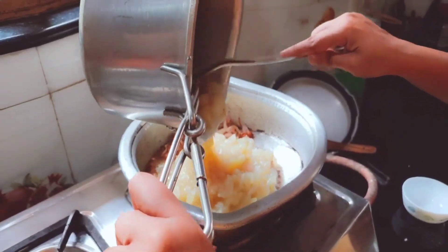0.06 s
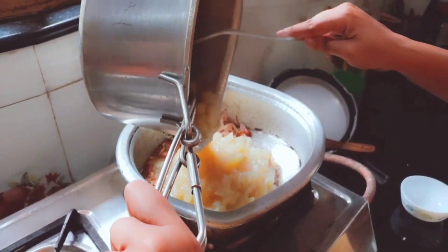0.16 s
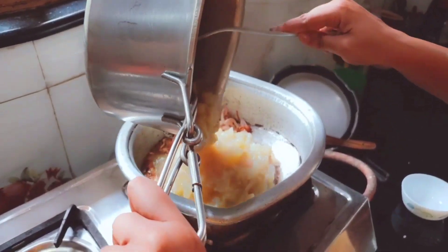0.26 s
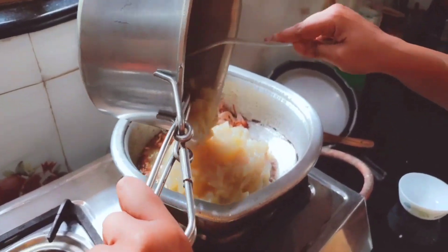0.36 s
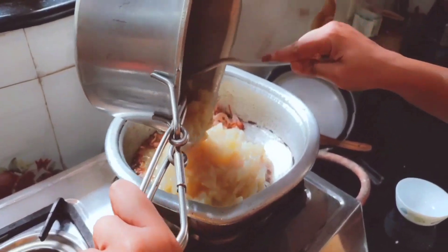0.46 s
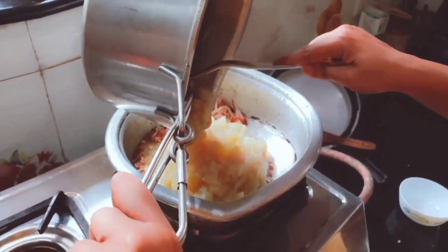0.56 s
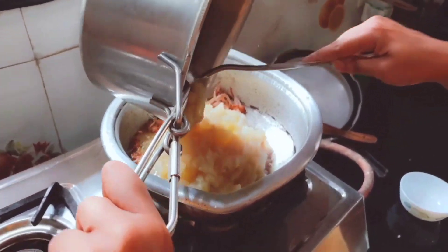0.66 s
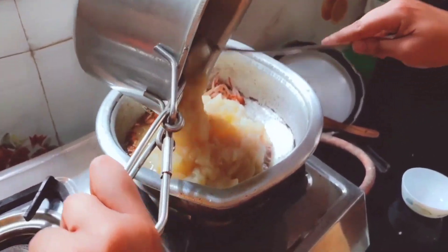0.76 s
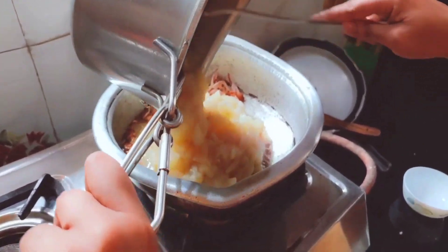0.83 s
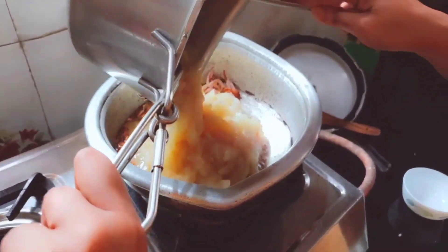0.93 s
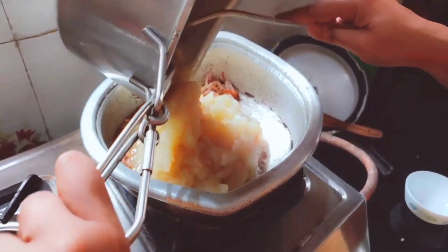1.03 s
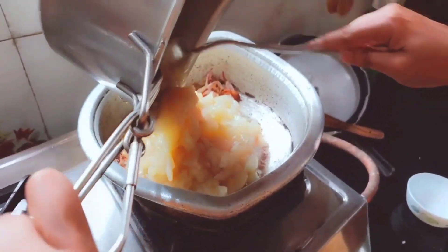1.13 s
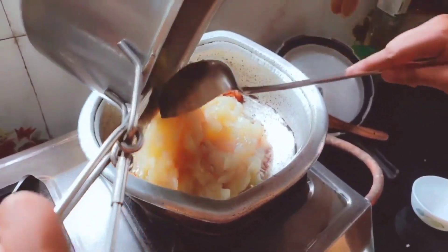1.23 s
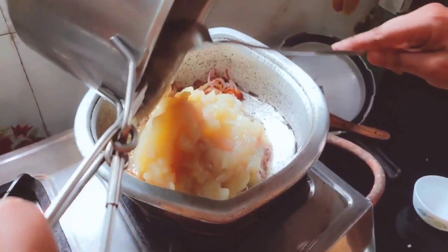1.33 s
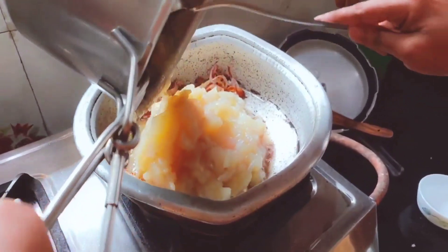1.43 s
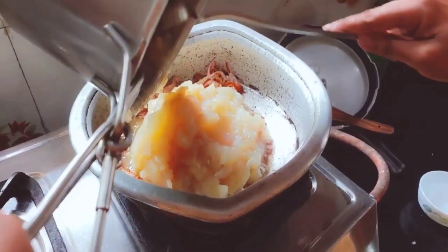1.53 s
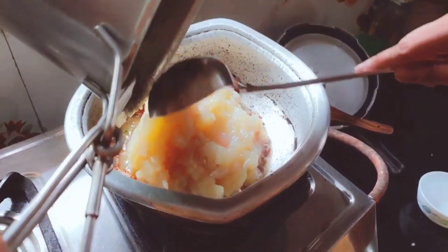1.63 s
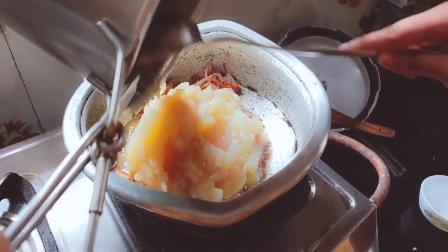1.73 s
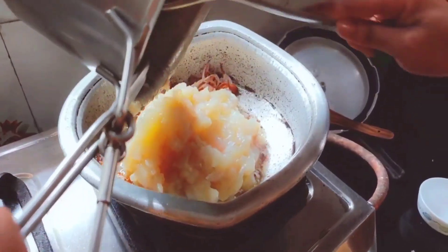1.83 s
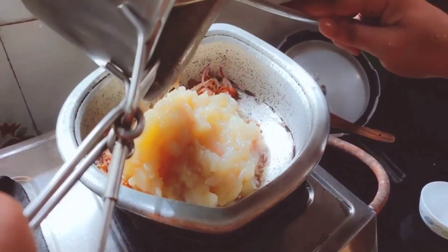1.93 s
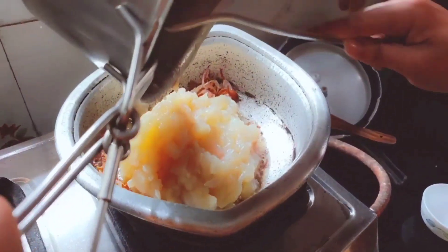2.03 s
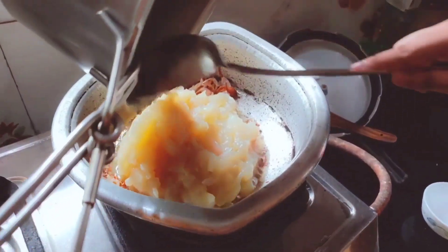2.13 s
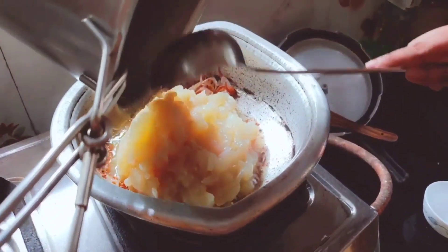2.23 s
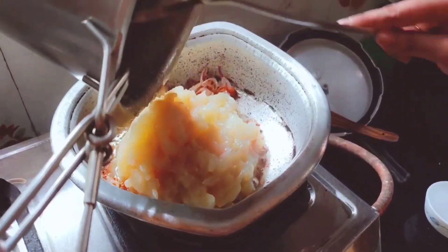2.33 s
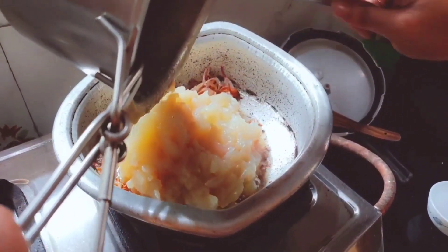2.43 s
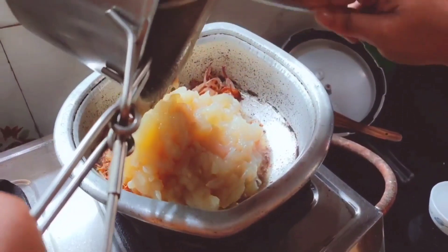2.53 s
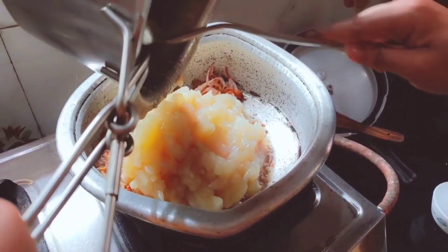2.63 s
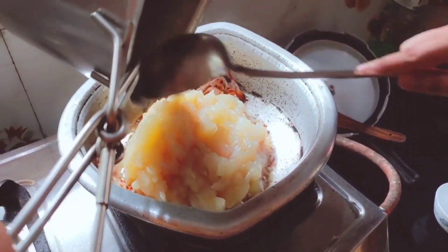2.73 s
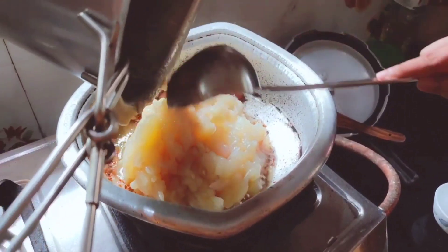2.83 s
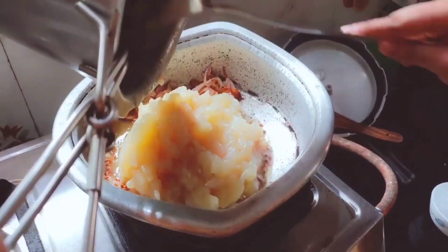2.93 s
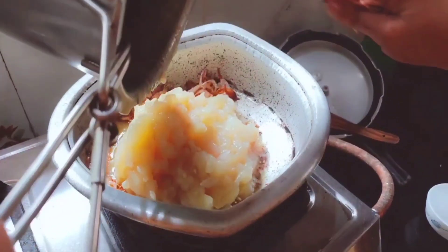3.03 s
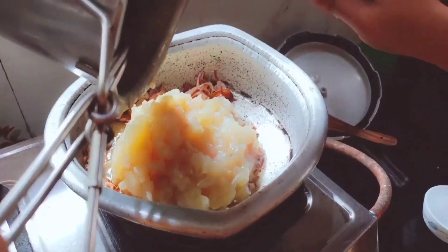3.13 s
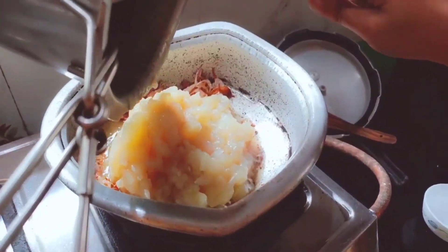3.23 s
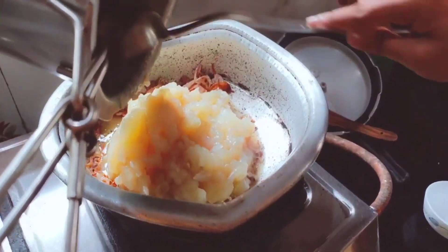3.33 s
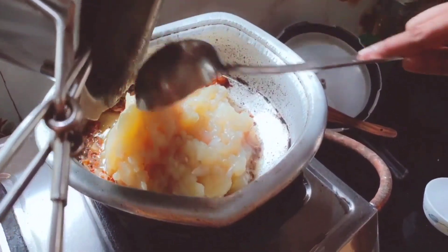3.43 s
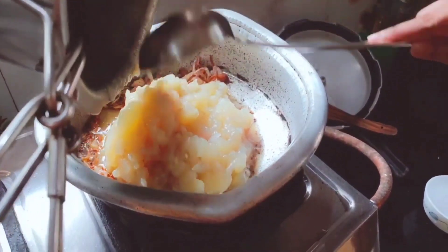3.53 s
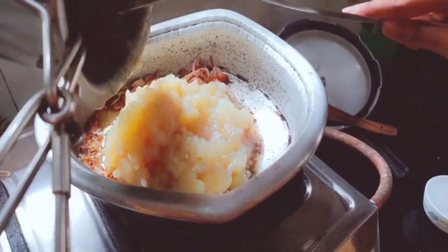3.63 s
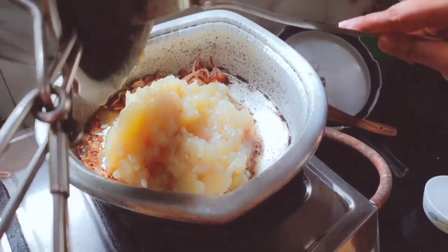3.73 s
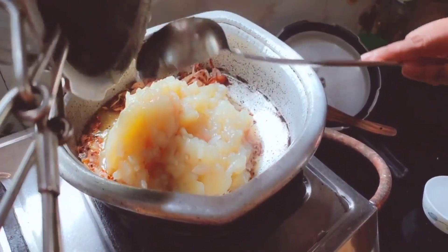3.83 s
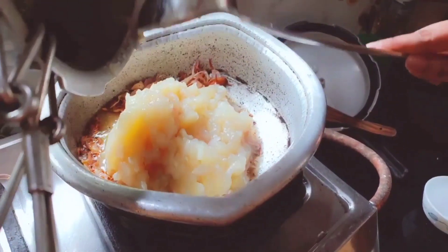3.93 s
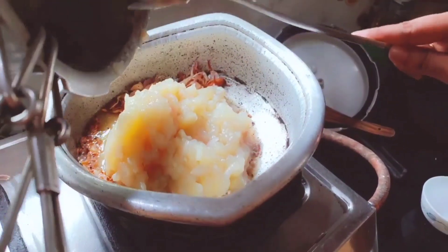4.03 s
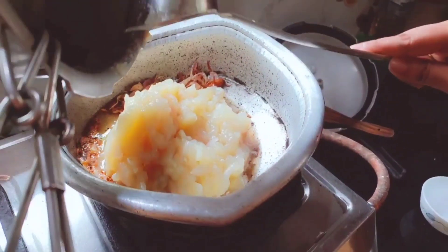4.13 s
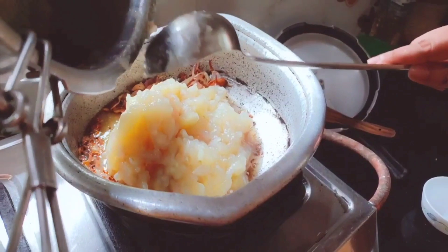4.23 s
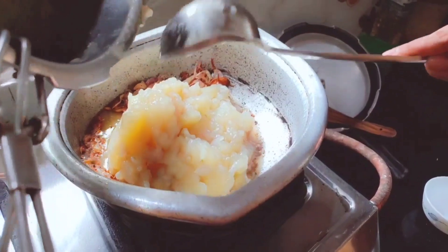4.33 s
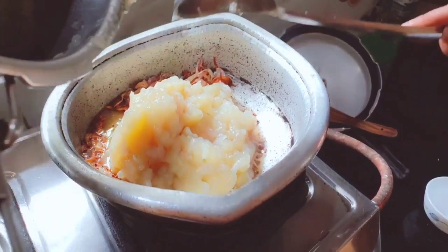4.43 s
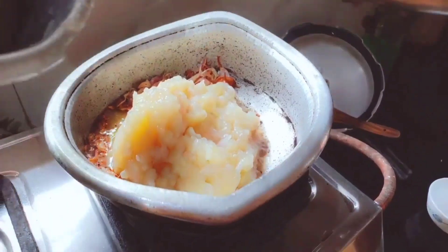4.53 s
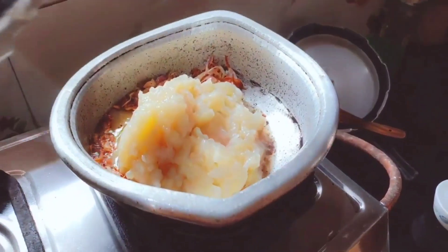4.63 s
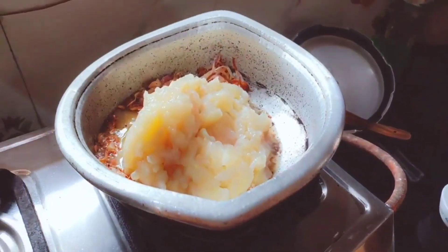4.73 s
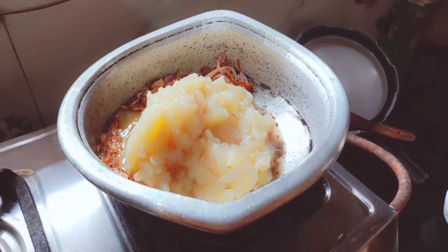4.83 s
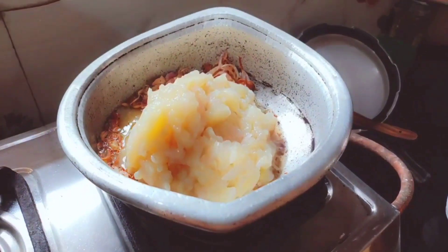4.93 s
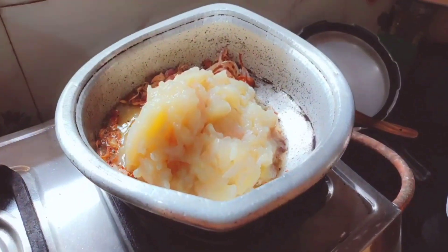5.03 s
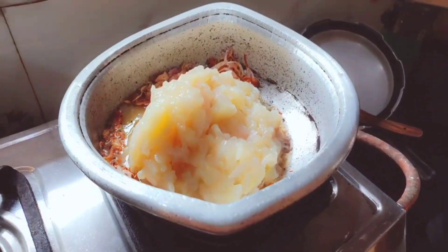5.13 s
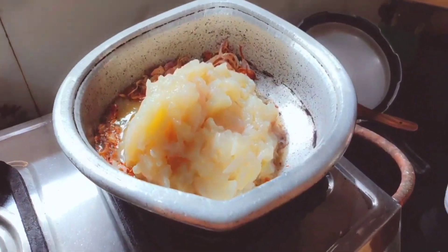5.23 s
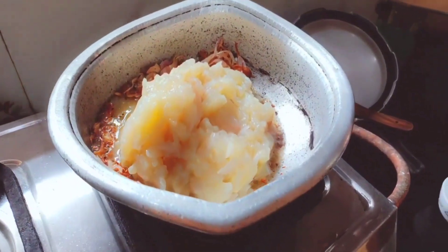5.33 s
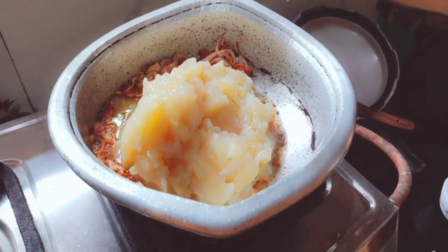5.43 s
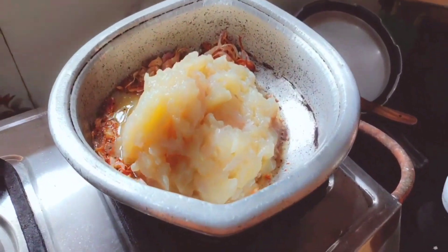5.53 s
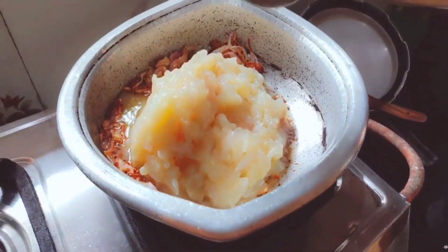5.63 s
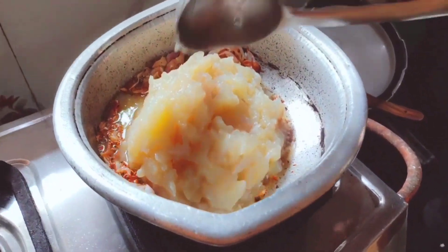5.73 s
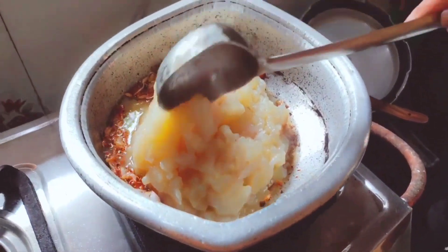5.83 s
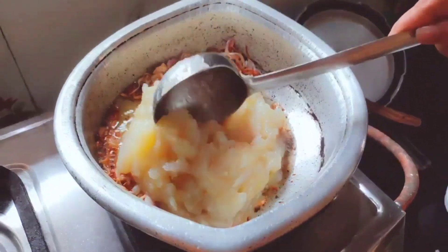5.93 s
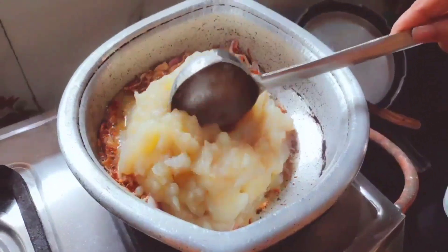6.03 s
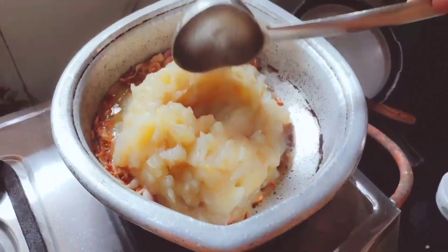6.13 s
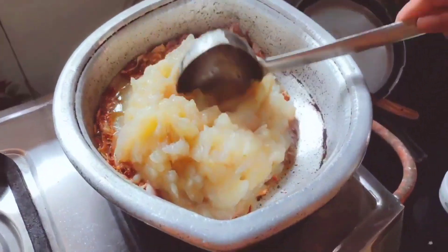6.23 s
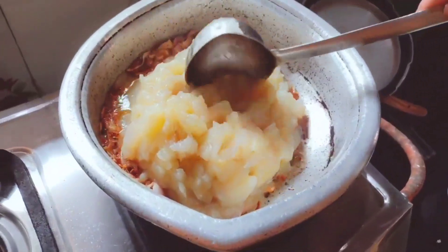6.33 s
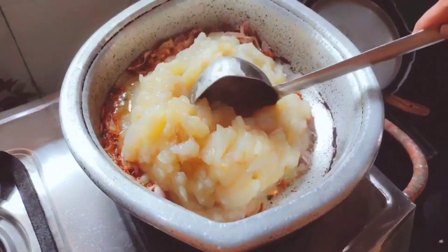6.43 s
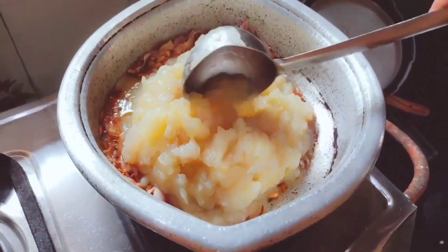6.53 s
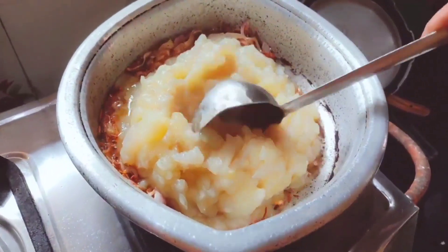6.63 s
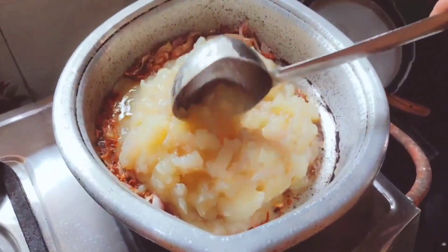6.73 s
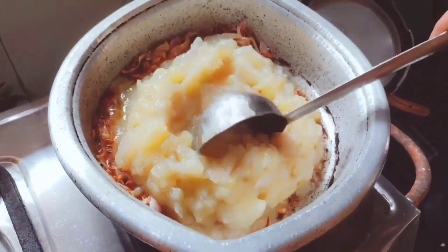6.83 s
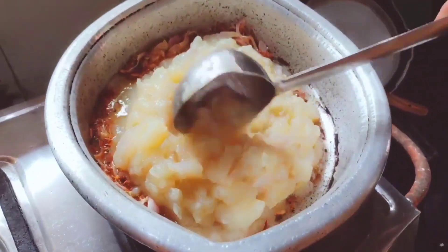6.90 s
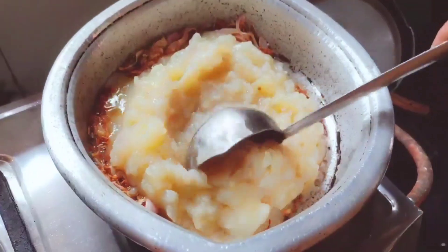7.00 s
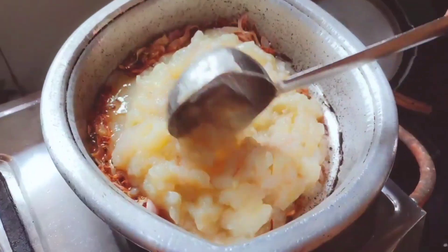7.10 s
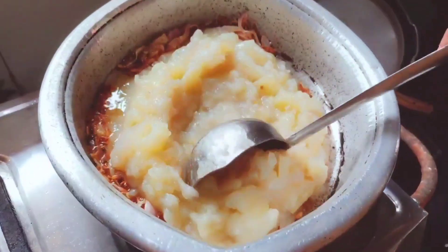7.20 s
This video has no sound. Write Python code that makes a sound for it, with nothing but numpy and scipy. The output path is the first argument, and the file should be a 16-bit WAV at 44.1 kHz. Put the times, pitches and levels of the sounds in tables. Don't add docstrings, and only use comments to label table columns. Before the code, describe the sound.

Sharp metallic clanks and short gritty scrapes of a ladle emptying a metal pot, a quiet gap, then duller, squelchy scrapes in a pan.

```python
import sys
import numpy as np
from scipy import signal
from scipy.fft import irfft
from scipy.io import wavfile
from scipy.ndimage import uniform_filter1d

SR = 44100
rng = np.random.default_rng(int(sys.argv[2]) if len(sys.argv) > 2 else 0)


def voltage_ratio(level):
    return 10 ** (np.asarray(level, float) / 20)


def bounce(signal):
    frames = np.transpose(np.atleast_2d(signal))
    limited = np.clip(frames, -1, 1)
    pcm = np.round(limited * 32767).astype(np.int16)
    wavfile.write(sys.argv[1], SR, pcm)


N = 320166
TIME = np.arange(N) / SR

# t/s, level/dB
HUM_LEVEL = [
    (0.0, -42),
    (.33, -48),
    (1.0, -48.5),
    (1.38, -44),
    (1.9, -39),
    (2.4, -47.5),
    (4.4, -46.5),
    (5.4, -48),
    (7.26, -55),
]
# f/Hz, density/dB per Hz
HUM_SPECTRUM = [(140, -24.5), (215, -16), (300, -41.5), (365, 2.5), (450, -16.5), (700, -11), (1200, -7.5),
                (2000, -6.5), (3000, -13), (4600, -12.5), (5700, -19.5), (6700, -31), (8200, -29.5),
                (9800, -34)]
# f/Hz, width/Hz, level over the hum/dB
AIR_DRONES = [(215, 20, -11), (366, 18, -30)]
# t/s, level/dB
HAND_BUMPS = [(0.0, -51), (.27, -63), (.55, -52), (.93, -62), (1.18, -60), (1.64, -49), (2.08, -53),
              (3.86, -54), (4.08, -49), (4.18, -46), (4.77, -67), (5.07, -44), (5.27, -51), (5.57, -59),
              (5.66, -49), (5.74, -49), (6.39, -49), (6.7, -49.5), (6.9, -61), (7.22, -55)]

# t/s, level/dB, f/Hz, length/s, width as share of f
SLURPS = [(2.43, -38, 1800, 0.054, 0.15), (4.661, -37, 1330, 0.028, 0.16), (4.778, -30, 940, 0.0068, 0.66),
          (6.27, -27, 3740, 0.0095, 0.049), (6.295, -13, 2228, 0.029, 0.015),
          (6.639, -12, 1590, 0.012, 0.17), (6.682, -10.5, 1510, 0.015, 0.42),
          (6.848, -29, 2560, 0.035, 0.11), (6.876, -26.5, 1050, 0.038, 0.13),
          (6.92, -20, 1610, 0.019, 0.13), (7.164, -23.5, 731, 0.021, 0.015),
          (7.246, -9.5, 1650, 0.018, 0.084)]
# t/s, level/dB, f/Hz, length/s, width as share of f
THUMPS = [(0.5, -23, 337, 0.017, 1), (3.71, -27.5, 363, 0.019, 0.23), (4.081, -21, 364, 0.023, 0.55),
          (4.783, -37, 366, 0.017, 0.39), (4.964, -33, 366, 0.012, 0.077), (5.056, -31, 412, 0.019, 0.2),
          (5.074, -44, 370, 0.0058, 0.069), (5.24, -38.5, 214, 0.032, 0.062),
          (5.335, -36.5, 215, 0.011, 0.033), (6.315, -20, 204, 0.034, 0.1),
          (6.65, -22.5, 458, 0.015, 0.066), (6.694, -11, 426, 0.0056, 0.21),
          (6.718, -12.5, 410, 0.0068, 0.27), (7.17, -28.5, 390, 0.022, 0.22)]
# t/s, level/dB, f/Hz, length/s, width as share of f
CLINKS = [
    (1.945, -8.5, 3260, 0.025, 0.0072),
    (6.267, -31.5, 6360, 0.015, 0.047),
    (6.268, -34.5, 4870, 0.011, 0.22),
    (7.01, -47.5, 5330, 0.017, 0.18),
    (7.138, -30.5, 3270, 0.048, 0.012),
]

# t/s, length/s, belly level/dB, wall minus belly/dB, ladle minus belly/dB
PAN_PUSHES = [(5.566, 0.073, -10, 0, -10), (5.63, 0.12, -15.5, -3, -12), (5.72, 0.048, -8.5, -3, -11.5),
              (5.903, 0.051, -13, 0.5, -7), (5.935, 0.046, -17, -3, -8), (5.97, 0.057, -23.5, 0, -9.5),
              (6.03, 0.041, -26.5, 3.5, -4), (6.075, 0.011, -25.5, -2, -1.5), (6.14, 0.019, -41.5, 0.5, -8),
              (6.302, 0.09, -12, -3, -8), (6.38, 0.081, -18.5, -5, -21.5), (6.635, 0.019, -28, 2, -41),
              (6.678, 0.046, -22.5, 6.5, -8.5)]
# t/s, length/s, belly level/dB, wall minus belly/dB, ladle minus belly/dB
PAN_SPREADS = [
    (6.875, .03, -45, 0, -17),
    (6.92, 0.032, -28.5, 5, -17),
    (7.145, 0.034, -35, -5, -8),
    (7.24, 0.029, -25.5, 5, -10),
]
# t/s, length/s, wall level/dB, belly minus wall/dB, ladle minus wall/dB
POT_DRAGS = [(0.005, 0.002, -14, -4, -16.5), (.032, 0.024, -16, -12.5, -27), (.616, 0.081, -18.5, -13, -12),
             (.676, 0.027, -15.5, -4.5, -4), (.75, 0.0029, -16.5, -2, -1.5),
             (1.055, 0.064, -22.5, -10.5, 0), (1.15, 0.06, -20.5, 1.5, -9), (1.555, 0.017, -25, -1, -18),
             (1.585, 0.035, -17, -9.5, -7), (2.05, 0.067, -20.5, 0, -1.5),
             (2.122, 0.011, -19.5, -11.5, 9.5), (2.162, 0.015, -19.5, 3.5, 6), (2.2, 0.1, -42, -10, 3.5),
             (2.63, 0.092, -28.5, -3.5, -4), (2.705, 0.0061, -19, -20, -1.5), (2.761, 0.0045, -15, -2, 5.5),
             (3.232, 0.02, -18.5, -25, 1), (3.312, 0.1, -16.5, -4.5, -12.5), (3.35, 0.08, -16, -16, -3.5),
             (3.775, 0.04, -27.5, -3.5, -4.5), (3.82, 0.016, -23, -10.5, -15), (4.125, 0.078, -27.5, 0, 0),
             (4.195, 0.007, -20.5, -24, -10)]
# attack/dB per s, swell while held/dB per s, release/dB per s
PUSH_SLOPES = [(2500, -6, 470), (2500, -34, 490), (2500, -41, 490)]
SPREAD_SLOPES = [(500, 0.0037, 270), (500, 0, 830), (490, 0, 87)]
DRAG_SLOPES = [(600, 26, 490), (600, 84, 610), (604, 13, 363)]
RATTLE_SLOPES = [(1500, -150, 240), (1500, -200, 170), (1500, -100, 190)]

# f/Hz, width/Hz, level/dB
PAN_PEAKS = [(641, 31, 0), (840, 60, -1), (1110, 170, 0), (1860, 80, -7), (2340, 110, -11), (2660, 80, -13),
             (2940, 25, -11), (3070, 35, -11), (3260, 33, -9), (3380, 15, -13), (3560, 78, -15),
             (4410, 90, -20), (5360, 36, -26), (5630, 39, -29), (6090, 42, -30), (6270, 28, -29),
             (6690, 58, -35), (6920, 58, -35)]
POT_PEAKS = [(673, 42, -10), (1010, 85, -11), (1230, 54, -10), (1850, 41, 0), (2360, 180, -5),
             (2770, 37, -10), (3260, 39, -10), (3530, 42, -10), (3700, 28, -12), (4110, 64, -12),
             (4410, 43, -18), (4790, 45, -17), (5710, 130, -24), (6390, 150, -29), (6690, 30, -27),
             (7140, 33, -31), (7490, 28, -29), (7780, 26, -32), (7950, 53, -29)]
# f/Hz, density/dB per Hz
PAN_RASP = [(100, -23), (200, -10), (290, 0), (400, 7.5), (900, 13), (1700, -21), (3000, -30),
            (4500, -21.5), (5200, -35), (7000, -45.5), (9200, -48), (10200, -61)]
POT_RASP = [(100, -22), (300, -11), (600, 5.5), (1200, 0.5), (2300, 7.5), (3600, -14), (4800, -17),
            (5400, -14.5), (7000, -23), (9200, -29.5), (10200, -31)]
STROKE_EDGES = (60, 1500, 2900, 12000)

# t/s, wall level/dB, then belly, ladle bowl and ladle edge minus wall/dB
RIM_KNOCKS = [
    (0.26, -13.5, -13, -8, -16.5),
    (0.412, -30.5, -23, -14, -29),
    (0.5028, -11.5, -9.5, -14, -25),
    (0.5151, -27, 8.5, -1.5, 0),
    (0.7443, -29, -5, 6, -19),
    (0.9604, -16.5, -10, 3, -2.5),
    (2.5094, -13, -11.5, 0.5, -8.5),
    (3.1104, -16, -4, 3, -5.5),
]
# t/s, wall level/dB, then belly, ladle bowl and ladle edge minus wall/dB
WALL_KNOCKS = [
    (0.0368, -26.5, -13, -2, -50),
    (1.05, -41.5, -19, 17.5, 12),
    (1.485, -17.5, 5, -4.5, -3.5),
    (1.9419, -21, -35, 6.5, 1),
    (2.596, -22, -32.5, 7.5, 0),
    (2.7185, -27.5, 9, 13, 13),
    (3.2328, -23.5, 6.5, -3, 6.5),
    (3.706, -14, -6, -4, -13.5),
    (4.0804, -13, -2, -9.5, -16),
]
# f/Hz, level/dB, t60/s
RIM_MODES = [(690, 0, .05), (500, -9, .05), (370, -9, .05), (2390, 0, .1), (2480, -9, .08),
             (2200, -16, .06), (3260, 0, .11), (3070, -8, .08), (3520, -7, .09), (3700, -10, .08),
             (4100, -8, .07), (4370, -6, .08), (4860, -3, .07), (5200, -10, .08), (5650, 0, .1),
             (6080, -9, .06), (6350, -4, .06), (6990, -3, .06), (7300, -12, .07), (8500, -10, .06),
             (9150, -16, .05)]
WALL_MODES = [(770, 0, .07), (640, -4, .06), (1000, -6, .06), (1210, -3, .1), (1835, 0, .12),
              (2090, -10, .07), (2350, -4, .09), (2490, -6, .06), (2700, -9, .08), (3270, 0, .11),
              (3500, -6, .07), (3690, -9, .08), (4100, -9, .07), (4380, -3, .08), (4800, 0, .08),
              (5650, -3, .1), (6200, -5, .06), (6580, -6, .06), (7030, -10, .07), (7950, -15, .06),
              (8520, -12, .06)]
KNOCK_EDGES = (1500, 2900, 4600)

# t/s, peak level/dB, f/Hz,
# length/s
POT_RINGS = [(0.023, -15.5, 1700, 0.023), (0.033, -16, 2370, 0.014), (0.042, -27, 4340, 0.026),
             (0.261, -25.5, 5630, 0.025), (0.259, -11.5, 2440, 0.011), (0.268, -8.5, 2485, 0.011),
             (0.266, -25.5, 6200, 0.0087), (0.504, -15, 2339, 0.016), (0.516, -16, 3260, 0.014),
             (0.62, -19.5, 2500, 0.029), (0.679, -15.5, 2350, 0.037), (0.745, -14, 2420, 0.0078),
             (0.748, -21, 4060, 0.026), (0.749, -25, 3250, 0.05), (0.962, -8, 2387, 0.013),
             (0.967, -18.5, 3490, 0.026), (0.968, -19.5, 3190, 0.019), (1.05, -23, 1796, 0.012),
             (1.068, -25.5, 4370, 0.025), (1.071, -22.5, 3200, 0.013), (1.075, -21, 2337, 0.031),
             (1.096, -19.5, 2440, 0.026), (1.104, -21.5, 1870, 0.1), (1.143, -18, 1847, 0.053),
             (1.169, -15, 2240, 0.013), (1.185, -15.5, 672, 0.022), (1.201, -23, 1810, 0.047),
             (1.225, -23.5, 667, 0.019), (1.484, -24, 2360, 0.016), (1.485, -28, 1160, 0.031),
             (1.487, -15, 1802, 0.011), (1.555, -21, 1200, 0.03), (1.584, -17.5, 1827, 0.019),
             (1.606, -24.5, 2374, 0.038), (1.62, -21, 1850, 0.029), (1.94, -15.5, 2336, 0.017),
             (1.943, -17, 4370, 0.007), (1.945, -25, 5900, 0.016), (1.945, -13.5, 1824, 0.022),
             (2.029, -23, 2470, 0.063), (2.098, -25.5, 4530, 0.062), (2.105, -20.5, 1096, 0.03),
             (2.107, -23.5, 2330, 0.031), (2.111, -21.5, 1900, 0.044), (2.122, -13.5, 1065, 0.016),
             (2.126, -12.5, 4150, 0.0097), (2.134, -19.5, 3710, 0.036), (2.17, -15.5, 3460, 0.017),
             (2.176, -19, 2375, 0.05),
             (2.512, -17, 5000, 0.014), (2.513, -6.5, 2382, 0.0093), (2.591, -18.5, 2384, 0.031),
              (2.591, -25.5, 6150, 0.027), (2.595, -20, 1787, 0.023), (2.597, -19.5, 3480, 0.016),
              (2.598, -21, 5700, 0.015), (2.597, -17.5, 4370, 0.029), (2.715, -13.5, 2300, 0.017),
              (2.721, -15, 3890, 0.011), (2.721, -16, 3590, 0.012), (2.721, -20.5, 1835, 0.036),
              (2.727, -26, 4860, 0.034), (2.761, -23, 782, 0.015), (2.76, -19, 2560, 0.017),
              (2.765, -18, 1730, 0.0134), (2.765, -27.5, 4740, 0.024), (2.765, -11, 3500, 0.016),
              (3.109, -12.5, 3170, 0.012), (3.109, -17, 3120, 0.014), (3.118, -8.5, 2356, 0.011),
              (3.168, -28.5, 3310, 0.066), (3.228, -10, 1718, 0.0092), (3.233, -23, 4430, 0.022),
              (3.234, -20.5, 1788, 0.048), (3.312, -14, 2415, 0.034), (3.336, -17.5, 1184, 0.035),
              (3.34, -7.5, 2430, 0.0087), (3.349, -7.5, 1845, 0.037), (3.35, -16, 3530, 0.047),
              (3.357, -18, 4780, 0.022), (3.364, -18, 3990, 0.027), (3.376, -9.5, 1867, 0.034),
              (3.386, -12.5, 2740, 0.029), (3.414, -18, 3300, 0.032), (3.42, -20.5, 1850, 0.046),
              (3.436, -14.5, 2360, 0.016), (3.445, -20, 2730, 0.014), (3.706, -22.5, 1212, 0.036),
              (3.705, -16, 1850, 0.037), (3.709, -14.5, 3590, 0.012), (3.711, -15.5, 3284, 0.021),
              (3.828, -22, 1820, 0.019), (4.082, -21.5, 1830, 0.022), (4.082, -14, 3275, 0.034),
              (4.093, -19, 2660, 0.016), (4.1, -30.5, 791, 0.17), (4.186, -22.5, 3250, 0.014),
              (4.204, -24, 1862, 0.015)]
PAN_RINGS = [(5.568, -23, 4350, 0.037), (5.566, -25, 1480, 0.018), (5.574, -17, 2270, 0.032),
             (5.576, -19.5, 3260, 0.022), (5.577, -12.5, 661, 0.039), (5.601, -15, 1910, 0.013),
             (5.636, -24.5, 3100, 0.035), (5.673, -24, 1960, 0.013), (5.729, -6, 986, 0.013),
             (5.732, -22, 2340, 0.025), (5.744, -17, 1685, 0.023), (5.767, -12.5, 1083, 0.018),
             (5.906, -13.5, 859, 0.02), (5.906, -20, 3270, 0.03), (5.907, -20, 1877, 0.0086),
             (5.908, -16.5, 4420, 0.024), (5.913, -15.5, 1320, 0.013), (5.936, -18, 1082, 0.02),
             (6.075, -36, 3270, 0.033), (6.304, -14.5, 2340, 0.014), (6.308, -22.5, 4100, 0.023),
             (6.32, -17, 3000, 0.015), (6.326, -10.5, 1102, 0.022), (6.327, -23, 3380, 0.033),
             (6.331, -6.5, 823, 0.0123), (6.34, -17.5, 3830, 0.012), (6.356, -13, 2337, 0.014),
             (6.356, -16.5, 1755, 0.016), (6.685, -20.5, 1580, 0.011), (6.885, -26.5, 1075, 0.032),
             (6.917, -26, 1650, 0.017)]


def unit(x):
    return x / np.sqrt(np.mean(x ** 2))


def smooth(x, length):
    return uniform_filter1d(uniform_filter1d(x, length), length)


def walk(rate):
    hold = max(int(1000 / rate), 2)
    coarse = np.repeat(rng.standard_normal(3000), hold)[:8000]
    return 1.3 * np.interp(TIME, np.arange(8000) / 1000, smooth(coarse, hold))


def peak(x, hz, width):
    return signal.lfilter(*signal.iirpeak(hz, hz / np.clip(width, 36, hz), SR), x)


def band_pass(x, lo, hi):
    return signal.lfilter(*signal.butter(2, (lo, hi), "band", fs=SR), x)


def colour(spectrum, lo=1, hi=SR / 2):
    f = np.fft.rfftfreq(2048, 1 / SR)
    hz, db = np.transpose(spectrum)
    skirts = np.sqrt((1 + (lo / (f + 1)) ** 12) * (1 + (f / hi) ** 12))
    gain = voltage_ratio(np.interp(np.log(f + 1), np.log(hz), db)) / skirts
    response = np.roll(irfft(gain), 1024) * np.hanning(2048)
    return response / np.sqrt(np.sum(response ** 2))


def coloured_noise(n, *band):
    return signal.oaconvolve(rng.standard_normal(n), colour(*band), "same")


def burst(t, length):
    u = np.clip(t / max(length, .008), 0, 40)
    return (u * np.exp(1 - u)) ** 2


def room_hum(ducked_db):
    noise = coloured_noise(N, HUM_SPECTRUM)
    sizzle = walk(25) + .6 * np.clip(walk(60), -1, 1.5)
    hum = np.zeros(N)
    for k, hz in enumerate(140 * 2 ** np.arange(0, 6.2, 1 / 3)):
        band = peak(peak(noise, hz, hz / 3), hz, hz / 3)
        hum += (-1) ** k * voltage_ratio(1.1 * sizzle + 2.9 * walk(45)) * band
    drone = np.zeros(N)
    for hz, width, db in AIR_DRONES:
        drone += voltage_ratio(db + 3 * walk(30)) * unit(peak(rng.standard_normal(N), hz, width))
    low_band = signal.butter(2, (22, 150), "band", fs=SR, output="sos")
    rumble = unit(signal.sosfilt(low_band, rng.standard_normal(N)))
    t, bump_s = TIME[::32], .021
    bumps = sum(voltage_ratio(db) * burst(t - s + bump_s, bump_s) for s, db in HAND_BUMPS)
    rumble *= voltage_ratio(-68 + 3 * walk(15)) + np.interp(TIME, t, bumps)
    level_db = np.interp(TIME, *np.transpose(HUM_LEVEL)) + ducked_db
    return voltage_ratio(level_db) * (unit(hum) + drone) + rumble


def duck_db(metal):
    memory_s, full_depth_s = .083, 1.97
    threshold_db, slope, most_db = -34.5, 2.1, 7
    keep = np.exp(-1 / (memory_s * SR))
    power = signal.lfilter([1 - keep], [1, -keep], metal ** 2)
    loud_db = 10 * np.log10(power + 1e-12)
    return -np.clip(slope * (loud_db - threshold_db), 0, most_db) * np.clip(TIME / full_depth_s, 0, 1) ** 2


def tiles(x, t60, wet_db, hz):
    t = TIME[:SR // 2]
    tail = rng.standard_normal(len(t)) * np.exp(-np.log(1000) * t / t60) * np.clip(t / 0.0024, 0, 1)
    tail = signal.lfilter(*signal.butter(1, hz, fs=SR), tail)
    return x + voltage_ratio(wet_db) * signal.oaconvolve(x, tail / np.sqrt(np.sum(tail ** 2)))[:N]


def noise_puffs(table):
    out, t = np.zeros(N + SR), TIME[:SR // 3]
    for s, db, hz, length, share in table:
        width = share * hz
        noise = unit(peak(peak(rng.standard_normal(len(t)), hz, width), hz, 3 * width))
        start = int((s - .1) * SR)
        out[start:start + len(t)] += voltage_ratio(db - 10) * burst(t - .094, length) * noise
    return out[:N]


def grit(lumpy_db):
    return unit(rng.standard_normal(N) * voltage_ratio(lumpy_db * (.45 * walk(90) + .75 * walk(330))))


def strokes(table, slopes):
    t = TIME[::32]
    s, length, db, second, third = np.array(table).T[:, :, None]
    forces = []
    for level_db, (attack, swell, release) in zip([db, db + second, db + third], slopes):
        held = np.clip(t - s, 0, length)
        shape_db = swell * (held - length / 2)
        shape_db = shape_db - attack * np.maximum(s - t, 0) - release * np.maximum(t - s - length, 0)
        force = np.sqrt(np.sum(voltage_ratio(level_db + shape_db) ** 2, axis=0))
        forces.append(np.interp(TIME, t, force))
    return np.array(forces)


def scraped_body(forces, peaks, rasp, rasp_share, wander_db, lumpy_db):
    out = np.zeros(N)
    for force, lo, hi in zip(forces, STROKE_EDGES, STROKE_EDGES[1:]):
        push = force * grit(lumpy_db)
        ring, power = np.zeros(N), 0
        for hz, width, db in peaks:
            if lo <= hz < hi:
                gain = voltage_ratio(db + 1.1 * wander_db * walk(20) - 1.5)
                ring += gain * peak(peak(push, hz, width), hz, 300 + width)
                power += voltage_ratio(db) ** 2 * np.pi * max(width, 36) / SR
        share = np.clip(rasp_share, 0, 1) * (.9 if lo > 2000 else 1)
        out += np.sqrt((1 - share) / power) * ring
        cuts = np.geomspace(max(lo, 160), hi, 5)
        plain = signal.oaconvolve(push, colour(rasp, lo, hi), "same")
        for a, b in zip(cuts, cuts[1:]):
            out += np.sqrt(share) * voltage_ratio(.55 * wander_db * walk(60) - .3) * band_pass(plain, a, b)
    return out


def pan_scrape():
    forces = np.hypot(strokes(PAN_PUSHES, PUSH_SLOPES), strokes(PAN_SPREADS, SPREAD_SLOPES))
    return scraped_body(forces, PAN_PEAKS, PAN_RASP, rasp_share=.92, wander_db=2.2, lumpy_db=2.5)


def biting_rings(table, flutter):
    out, t = np.zeros(N + SR), TIME[:SR // 4]
    for s, db, hz, length in table:
        u = t / np.clip(length / 1.5, .007, .06)
        noise = rng.standard_normal((2, len(t)))
        rough = unit(smooth(noise, 150))
        tone = (1 + flutter * (rough[0] + 1j * rough[1])) * np.exp(2j * np.pi * hz * t)
        start = int((s - .3 * length) * SR)
        out[start:start + len(t)] += voltage_ratio(db) * (u * np.exp(1 - u)) ** 3 * tone.imag
    return out[:N]


def knocks(table, modes, lead_s, spot_db, detune, crack_db):
    out, t = np.zeros(N + SR), TIME[:SR // 6]
    contact_s = .0115
    push = burst(t, contact_s)
    hz, mode_db, t60 = np.transpose(modes)
    family = np.searchsorted(KNOCK_EDGES, hz)
    family_power = np.bincount(family, voltage_ratio(mode_db) ** 2)[family]
    ring_times = np.clip(.55 * t60, .03, .12)
    chance = rng.standard_normal((len(table), 3, len(hz)))
    for (s, db, belly, bowl, edge), (size, pitch, phase) in zip(table, chance):
        family_db = np.array([belly, 0, bowl, edge])[family]
        gain = voltage_ratio(db - 4.5 + family_db + mode_db + spot_db * size) / np.sqrt(family_power)
        low = coloured_noise(len(t), POT_RASP, 1, KNOCK_EDGES[1])
        high = coloured_noise(len(t), POT_RASP, KNOCK_EDGES[1], SR / 2)
        sound = voltage_ratio(db + crack_db) * burst(t, 1.19 * contact_s) * (low + voltage_ratio(bowl) * high)
        for f, g, ring_s, turn in zip(hz * (1 + detune * pitch), gain, ring_times, phase):
            swing = signal.lfilter([1], [1, -np.exp(-np.log(1000) / (ring_s * SR))], push)
            flutter = 1 + .38 * unit(smooth(rng.standard_normal(len(t)), 130))
            sound += g * flutter * swing / swing.max() * np.sin(2 * np.pi * (f * t + turn))
        start = max(int((s - lead_s) * SR), 0)
        out[start:start + len(t)] += sound
    return out[:N]


def pot_knocks():
    rim = knocks(RIM_KNOCKS, RIM_MODES, lead_s=.0115, spot_db=3, detune=.004, crack_db=-13.5)
    wall = knocks(WALL_KNOCKS, WALL_MODES, lead_s=.012, spot_db=2, detune=.004, crack_db=-6.5)
    return rim + wall


def pot_scrape():
    late_s, length_s = .023, .014
    rattles = [(s + late_s, length_s, db - 20.5, belly + .5, bowl + 12.5)
               for s, db, belly, bowl, edge in RIM_KNOCKS + WALL_KNOCKS]
    wall, belly, ladle = np.hypot(strokes(POT_DRAGS, DRAG_SLOPES), strokes(rattles, RATTLE_SLOPES))
    return scraped_body([belly, wall, ladle], POT_PEAKS, POT_RASP, rasp_share=.9, wander_db=3, lumpy_db=3.5)


def scene():
    metal = pot_scrape() + pan_scrape() + pot_knocks() + noise_puffs(SLURPS + THUMPS + CLINKS)
    sung = biting_rings(POT_RINGS + PAN_RINGS, flutter=.3)
    metal = sung + tiles(metal, t60=0.33, wet_db=-21.5, hz=4160)
    return (metal + room_hum(duck_db(metal)))[None]


def band_limit(x):
    return signal.sosfilt(signal.butter(12, 15480, fs=SR, output="sos"), x)


def record(dry):
    bent = np.tanh(dry) - dry
    rounded = dry + signal.filtfilt(*signal.butter(2, 300, "high", fs=SR), bent)
    cut = signal.sosfilt(signal.ellip(7, .5, 80, 9350, fs=SR, output="sos"), rounded)
    hiss = voltage_ratio(-77.5) * rng.standard_normal(dry.shape)
    fade = np.clip((N / SR - TIME) / .003, 0, 1)
    return band_limit(cut * fade + hiss)


dry = scene()
out = record(dry)
bounce(out)
```